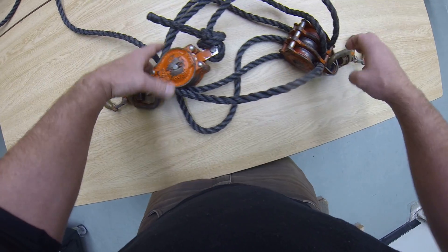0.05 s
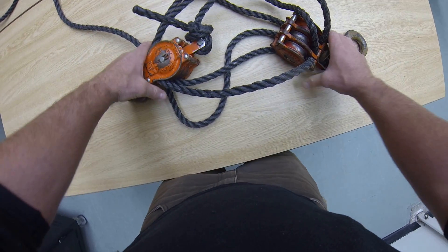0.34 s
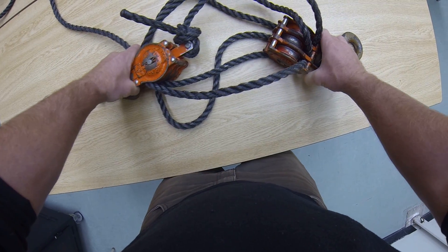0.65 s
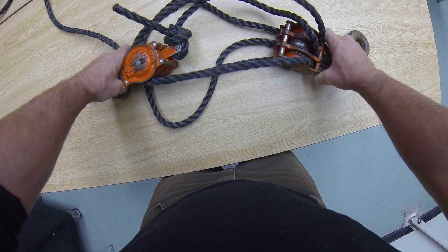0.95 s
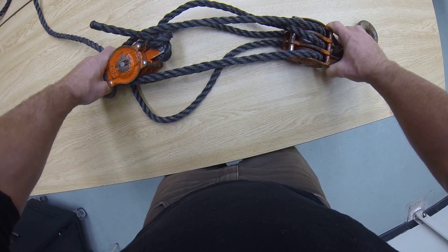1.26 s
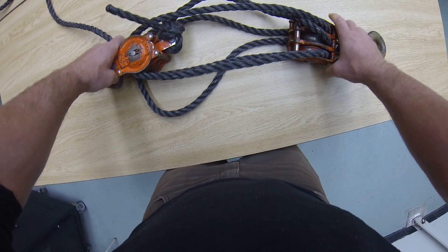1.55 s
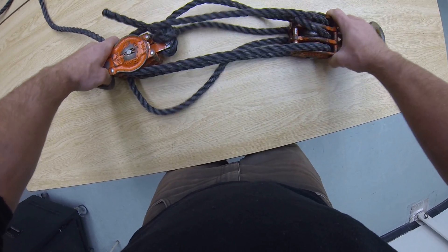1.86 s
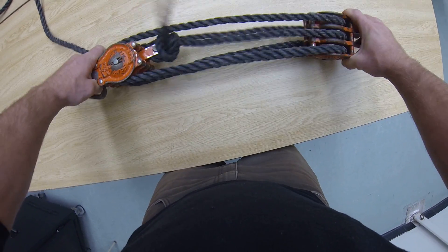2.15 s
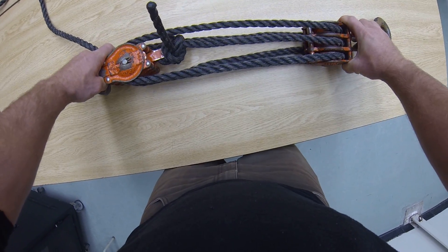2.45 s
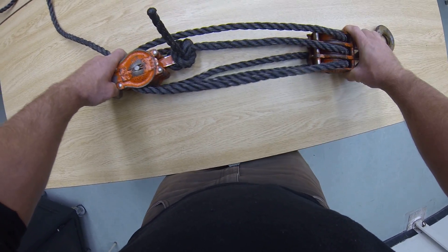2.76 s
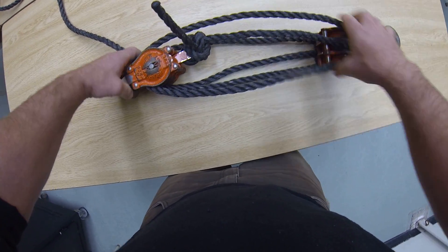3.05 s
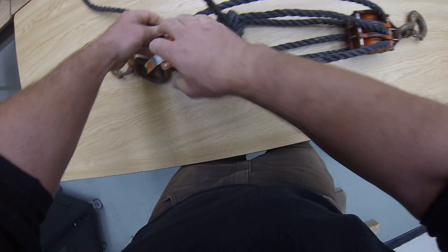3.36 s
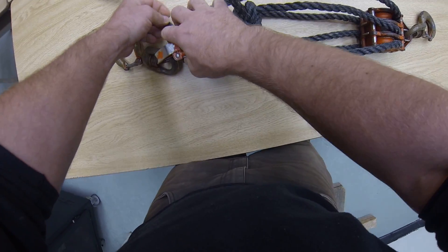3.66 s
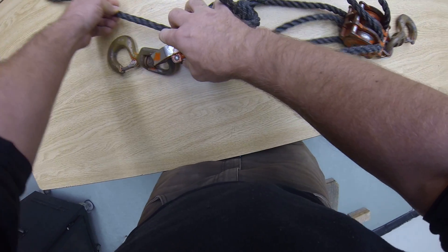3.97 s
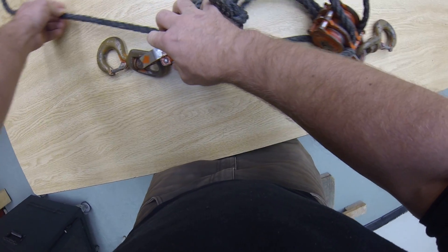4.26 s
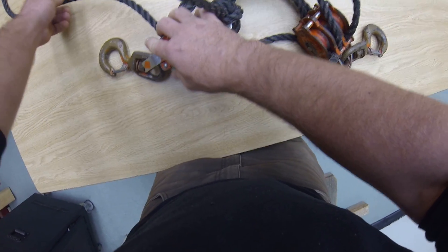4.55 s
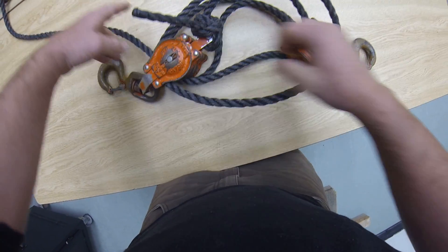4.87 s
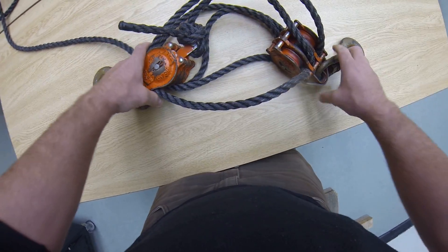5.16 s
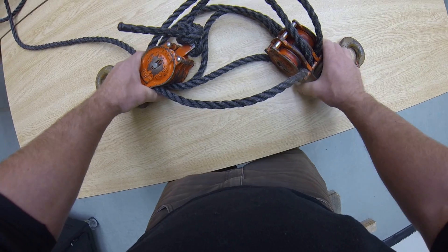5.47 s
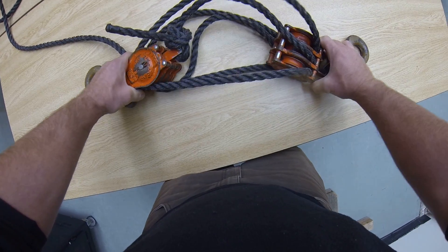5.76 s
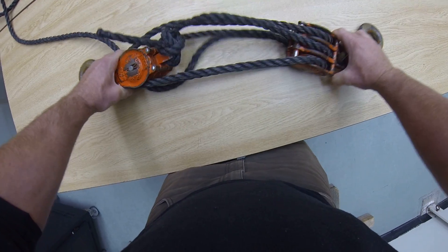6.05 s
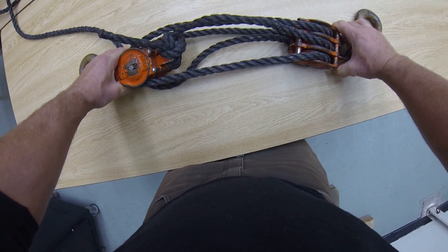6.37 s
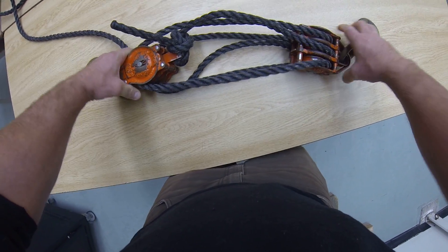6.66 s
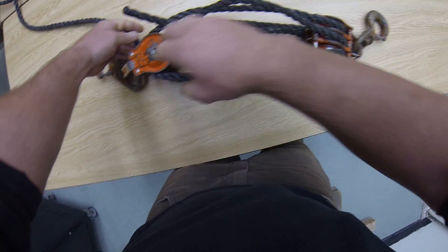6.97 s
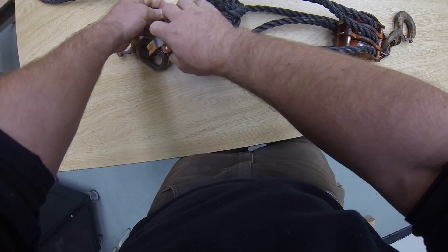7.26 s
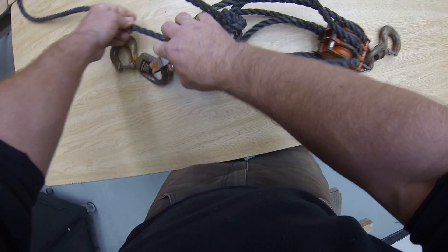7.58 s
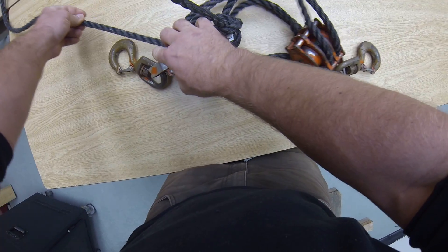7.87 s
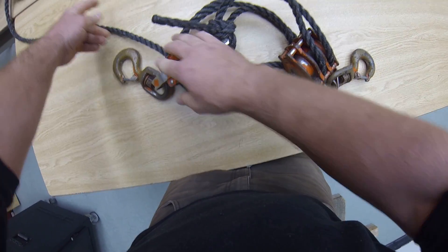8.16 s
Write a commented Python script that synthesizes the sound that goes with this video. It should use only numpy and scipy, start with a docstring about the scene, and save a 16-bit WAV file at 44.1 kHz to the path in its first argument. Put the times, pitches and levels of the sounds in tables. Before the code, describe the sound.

Rope rasps through rumbling pulley blocks in short pulls, while the metal blocks knock, scrape and clank on a wooden table.

```python
"""A bare room, where a block and tackle is drawn apart and hauled together three times on a wooden table.
Stick-slip friction in turning sheaves and sliding blocks drives the modes of the table top into a rumble, while
the laid rope rasps and crackles. Impacts of blocks and hooks, and rope strands bumping over a sheave, excite
knocks, clicks and two hard iron clanks, over a steady ventilation noise. A limiter ducks the two clanks, and
its slow recovery lets the room swell up behind them."""
import sys
import numpy as np
from scipy import signal
from scipy.fft import rfft, irfft
from scipy.io import wavfile
from scipy.ndimage import uniform_filter1d

SR = 44100
rng = np.random.default_rng(int(sys.argv[2]) if len(sys.argv) > 2 else 0)


def master(y):
    """Save y as 16-bit WAV."""
    cut = np.clip(np.atleast_2d(y).T, -1, 1)
    pcm = np.round(cut * 32767)  # scale
    wavfile.write(sys.argv[1], SR, pcm.astype(np.int16))


N = 371322
TIME = np.arange(N) / SR

# Pulls on the tackle. Each row: start and length in seconds, rumble at mid-pull in dB, swell from start
# to end in dB, block drag and rope rasp in dB against the rumble. Levels are relative within each table.
PULLS = [(0.535, 0.024, -31.5, -10, 4.5, -28), (0.66, 0.23, -35, 2, 4.5, -19),
         (0.848, 0.29, -29, 12, 3, -15.5), (1.448, 0.025, -28.5, -10, -2, -23),
         (1.758, 0.27, -34.5, 12.5, 1.5, -14.5), (2.118, 0.19, -39, -5, 6, -10),
         (2.785, 0.47, -34, -2, -0.5, -15.5), (3.426, 0.44, -43.5, 9, -1, -13),
         (3.777, 0.16, -32.5, 18.5, 7.5, -15), (3.962, 0.41, -21, 5, -7.5, -16),
         (4.521, 0.36, -41, 7.5, 6.5, -8), (5.026, 1, -44.5, 7, -1.5, -12),
         (5.592, 0.14, -28.5, 7.5, 7, -16.5), (5.97, 0.4, -27.5, -11.5, 1, -15.5),
         (6.588, 0.061, -38, -4, 4.5, -11), (7.465, 0.1, -28.5, 5.5, -2.5, -15),
         (7.56, 0.33, -20.5, 12, -9, -16.5), (7.953, 0.053, -37, -10, 6, -16),
         (8.11, 0.3, -36, -11, -19, -10)]
# Faint stirring between pulls. The entries: levels of rumble, drag and rasp in dB.
IDLE_DB = [-61, -54, -76.5]
# Blocks scraping over the table. Each row: start and length in seconds, level in dB, first and last
# pitch in Hz.
SLIDES = [(0.864, 0.43, -34, 300, 221), (1.881, 0.22, -30, 350, 304.6), (2.07, 0.58, -48, 212.8, 158.4),
          (5.579, 0.272, -32.5, 280.8, 315), (5.929, 0.5, -32, 360, 260)]
# A sheave pin gripping. Each row: start and length in seconds, level in dB, pitch in Hz.
GRUNTS = [(3.558, 0.028, -19.5, 485), (4.439, 0.024, -14, 500)]
# Motions of the rope. Each row: start in seconds, length in seconds, level in dB.
SLACK_RUNS = [(1.6, 0.37, -42), (2.03, 0.26, -52), (4.85, 0.27, -51), (7.0, 0.36, -54), (7.36, 0.17, -42)]  # running out with no load
STRAINS = [(0.55, 0.33, -64), (0.88, 0.17, -53), (1.02, 0.18, -52), (2.06, 0.25, -48), (5.99, 0.13, -44)]  # fibres snapping taut
GRIPS = [(3.32, 0.39, -55), (7.02, 0.2, -54.5)]  # squeezed in the hand
BRUSHES = [(3.4, 1, -64), (4.7, 0.69, -65), (6.3, 0.87, -63.5), (7.3, 0.71, -62)]  # running lightly through the hand

# Impacts. Each row: start in seconds, level in dB, contact pitch in Hz (higher is harder).
KNOCKS = [(0.553, -27.5, 445), (0.571, -18.5, 386), (0.598, -17.5, 445), (0.627, -23.5, 450),
          (0.682, -26.5, 436), (0.731, -16.5, 540), (0.914, -15, 308), (1.217, -17, 272),
          (1.481, -12.5, 364), (1.509, -13, 375), (1.5617, -3.5, 308), (1.577, -12.5, 290),
          (1.858, -15.5, 264), (2.6076, -2, 310), (2.624, -9, 300), (2.646, 1, 222), (2.7726, -2.5, 428),
          (2.780, -26, 400), (3.0395, -12.5, 480), (3.0455, -16, 765), (3.171, -16.5, 388),
          (3.563, -20.5, 460), (3.752, -20.5, 370), (4.146, -13.5, 317), (4.276, -20, 560),
          (4.318, -23, 520), (4.371, -13.5, 460), (4.456, -9.5, 530), (4.802, -18.5, 250),
          (4.871, -14, 350), (4.878, -16, 128), (5.276, -18.5, 360), (5.296, -22.5, 294.4),
          (5.548, -37, 293), (5.613, -21.5, 400), (5.789, -13.5, 450), (5.995, -30, 477),
          (6.023, -12.5, 450), (6.199, -15, 420), (6.282, -17, 380), (6.808, -28, 435), (7.346, -35.5, 490),
          (7.498, -13.5, 470), (7.537, -20, 466), (7.599, -11.5, 580), (7.716, -10.5, 473),
          (7.758, -14, 620), (7.929, -14, 550), (8.1415, -17, 480), (8.148, -8.5, 194), (8.304, -15, 264),
          (8.311, -17.5, 158.3)]  # blocks and hooks on the table; those within the hauls are rope strands bumping over a sheave
CLANKS = [(1.5615, 3.5, 1020), (2.6533, 3.5, 945)]  # iron on iron: the near block, then the far one
CLICKS = [(0.055, -33, 2300), (0.445, -39.5, 1690), (0.590, -33, 2140), (0.611, -38, 2200),
          (0.736, -45, 2000), (0.922, -30.5, 2880), (0.949, -41, 5200), (1.186, -32.5, 2940),
          (1.482, -33, 1674), (1.836, -45, 8000), (1.926, -36, 7750), (2.093, -31, 2040),
          (2.107, -49, 4500), (2.136, -31.5, 2030), (2.171, -39, 6500), (2.183, -40.5, 3500),
          (2.217, -32, 5430), (2.577, -32, 2080), (2.917, -30.5, 3970), (3.168, -36.5, 3900),
          (3.463, -45.5, 2280), (3.718, -41, 2580), (4.751, -32.5, 2400), (4.871, -17, 1450),
          (4.873, -31.5, 8300), (5.264, -41, 3160), (5.528, -35.5, 1900), (5.786, -32, 3200),
          (6.111, -38, 4950), (7.114, -39, 1900), (7.279, -33, 2180), (7.476, -41, 3000),
          (7.494, -31, 3430), (8.190, -38, 2800), (8.329, -38, 2580)]  # shackles and sheave pins
# Hooks ringing freely. Each row: start in seconds, level in dB, factor on the mode frequencies.
HOOK_HITS = [(0.055, -34, .87), (3.676, -39, .88), (4.751, -37, 1.02), (5.785, -17.5, 1)]

# Modes of a hook. Each row: frequency in Hz, level in dB, time to fall 60 dB in seconds.
HOOK_MODES = [(2013, -6, .03), (2099, 0, .05), (2385, -13, .05), (2875, -10, .06)]
# Modes of the other bodies. Each row: frequency in Hz, bandwidth in Hz, level in dB.
TABLE_MODES = [(96.3, 22, 7), (144.4, 10, 4.5), (207.3, 7, 12), (259.7, 18, 8.5), (293, 26, 2.5),
               (400, 27, 6), (445, 52, 7), (477.5, 29.7, 8.5), (517, 54, -9.5), (620, 140, 5),
               (674, 16, -0.5), (770, 36, 6.5), (980, 18, -17), (893, 30, 3.5), (978, 18, 0.5),
               (1016, 28, 6.5), (1150, 14, -6.5), (1410, 30, 4), (1558, 7.9, -1.5), (1930, 10, 0),
               (1870, 14, 4)]
NEAR_BLOCK_MODES = [(565, 26, 8), (805, 16, 6), (872, 20, 8), (942, 18, 8), (1005, 13, 9), (1050, 14, 8),
                    (1126, 11, 7), (1556, 16, 4), (1787, 45, 6), (1938, 14, 3), (2051, 16, 3)]
FAR_BLOCK_MODES = [(425, 14, 0), (598, 14, 0), (725, 12, 6), (785, 14, 5), (883, 16, 5), (933, 20, 10),
                   (1067, 40, 12), (1114, 20, 5), (1545, 16, 3), (1800, 25, 3), (1940, 30, 4),
                   (2191, 18, 3)]
SHACKLE_MODES = [(2080, 62, -3.5), (2900, 120, 4.5), (3880, 130, 3.5), (5200, 180, 5), (6460, 160, 9.5),
                 (8500, 250, 13.5)]
PIN_MODES = [(1790, 60, -3), (2060, 130, 3)]

# Spectra of the sources. Each row: frequency in Hz, level in dB.
SHEAVE_SPECTRUM = [(120, -45), (260, 3.5), (400, -4), (500, 4.5), (700, -1.5), (1050, -8.5), (1300, -12),
                   (2000, -35.5), (4000, -56.5), (15000, -100)]
DRAG_SPECTRUM = [(40, -33), (90, -10), (165, -4), (215, -3.5), (275, -2), (340, -3), (500, -20),
                 (1200, -72), (8000, -100)]
RASP_SPECTRUM = [(600, -13), (1300, -8.5), (1700, 1.5), (2100, 0.5), (2500, -9), (3100, -6.5), (4300, -23),
                 (5200, -25), (6800, -45.5), (8600, -33.5), (14000, -56.5)]
SNAG_SPECTRUM = [(100, -56.5), (500, -21), (750, -8), (1080, -1.5), (1350, -10), (1800, -5), (2150, -14),
                 (2600, -19.5), (4000, -33), (15000, -69)]  # strands catching on the cheek of a block
KNOCK_SPECTRUM = [(40, 0.5), (120, -3), (400, -0.5), (1100, 1.5), (1400, -2.5), (2000, 10.5), (2500, -1.5),
                  (3300, 0.5), (5000, -19), (7000, -12.5), (11000, -27.5), (15000, -16.5)]
CLANK_SPECTRUM = [(50, -9.5), (130, -5), (300, 12), (480, 6), (700, 6.5), (900, 2), (1150, 2), (1400, 3.5),
                  (1900, 10.5), (2500, 3.5), (3200, 6.5), (4300, -2.5), (5500, -4.5), (7000, -23.5),
                  (11000, -41.5), (15000, -53)]
CLICK_SPECTRUM = [(60, -40.5), (300, -16.5), (1200, -11), (2000, -9.5), (5500, -12.5), (7000, -18.5),
                  (11000, -12), (15000, -24)]
BRUSH_SPECTRUM = [(1500, 3.5), (2800, 4.5), (3700, 11.5), (4300, -4), (5050, 8.5), (6200, -42.5),
                  (7800, -17), (8800, 2.5), (10000, -44), (15000, -32)]
AIR_SPECTRUM = [(20, 1), (45, -10.5), (85, -11.5), (140, -7), (210, -15.5), (500, -20), (1000, -29),
                (1400, -36), (1950, -34.5), (2500, -42), (3200, -42), (4300, -51.5), (5100, -49),
                (6500, -56), (11500, -55.5), (15000, -64.5)]
# Machine hum in the building and a thin electronic whine. Each row: frequency in Hz, level in dB.
HUM_TONES = [(43, -44.5), (145, -51.5), (1933, -91.5), (10644, -79.5), (13188, -94)]

# Reverberation. Each row: frequency in Hz, time to fall 60 dB in seconds.
ROOM_T60 = [(100, 0.64), (400, 0.86), (1000, 1), (2000, 1), (4000, 0.74), (6000, 0.73), (10000, 0.18)]
# Early reflections. Each row: delay in seconds, gain as a factor.
ECHOES = [(.0058, -0.0028), (.009, 0.038), (0.0116, -0.17), (0.016, .3), (.0265, 0.15)]


def hauling(lay_hz=23.28, lay_db=3.2):
    """Stick-slip friction drives sheaves, blocks and rope; strands bumping over a sheave modulate it."""
    rumble, drag, rasp = efforts()
    strands = amp(-lay_db * np.cos(2 * np.pi * lay_hz * TIME + 0.33 * wander(2.1)))
    surges = amp(0.8 * wander(25))  # the rope binds and frees
    jolts = colour(slips(per_s=1200, spread_db=2.5) * strands, SHEAVE_SPECTRUM)
    sheaves = table_top(through(jolts, ringing(NEAR_BLOCK_MODES, ring_db=-17.5)))
    blocks = table_top(colour(slips(per_s=500, spread_db=4), DRAG_SPECTRUM))
    rubbing = colour(slips(per_s=1200, spread_db=4) * strands, RASP_SPECTRUM)
    rubbing = through(rubbing, ringing(PIN_MODES, ring_db=-3.5))
    rope = unit(through(rubbing, room(wet_db=1)))
    snags = colour(slips(per_s=220, spread_db=2) * strands, SNAG_SPECTRUM)
    snags = through(snags, ringing(FAR_BLOCK_MODES, ring_db=-9))
    snags = unit(through(snags, room(wet_db=-6)))
    turning = rumble * (amp(-1.4) * sheaves + amp(-16) * snags)
    running = amp(-6.5) * (rasp + swells(SLACK_RUNS)) * rope
    return surges * (turning + running) + amp(-1.5) * drag * blocks


def efforts(attack_s=0.076, coast_db_per_s=59.5):
    """Incoherent pulls add in power. Rumble and rasp grow with speed; dry sliding drag does not."""
    power = amp(IDLE_DB)[:, None] ** 2 * np.ones(N)
    for start, length, db, swell_db, drag_db, rasp_db in PULLS:
        t = TIME - start
        stroke = np.clip(t / attack_s, 0, 1) * amp(db - coast_db_per_s * np.maximum(t - length, 0))
        speed = amp(swell_db * (np.clip(t / length, 0, 1) - .5))
        power += np.square([stroke * speed, stroke * amp(drag_db), stroke * speed * amp(rasp_db)])
    return np.sqrt(power)


def table_top(force, places=3, shifts_per_s=2.5):
    """Modal response depends on the driving point, so table and room ring differently as blocks travel."""
    out = np.zeros(N)
    for place in range(places):
        coupling = np.cos(np.pi * (shifts_per_s * TIME + place / places))
        body = signal.fftconvolve(ringing(TABLE_MODES, ring_db=-2, uneven_db=4), room(wet_db=1))
        out += through(force * coupling, body)
    return unit(out)


def clanks():
    """Hard impacts excite the free vibration of each iron block; rebounds and loose sheaves clatter."""
    out = np.zeros(N)
    for row, modes in zip(CLANKS, (NEAR_BLOCK_MODES, FAR_BLOCK_MODES)):
        hits = bouncing([row], count=3, gap_s=.0085, rebound_db=-12)
        struck = blows(hits, decay_cycles=0.76, chatter_db=0.5, chatter_t60=0.065)
        out += through(struck, ringing(modes, ring_db=-5))
    return through(colour(out, CLANK_SPECTRUM), room(wet_db=-12, build_s=0.03))


def knocks(places=4):
    """Impacts of blocks and hooks, and strands of the rope bumping over a sheave during hauls, excite the
    table's modes, in different proportions at each place."""
    out = np.zeros(N)
    for place in range(places):
        hits = bouncing(KNOCKS[place::places], count=1, gap_s=.0068, rebound_db=-1.5)
        struck = amp(-0.02) * blows(hits, decay_cycles=0.51, chatter_db=-4.5, chatter_t60=0.029)
        out += through(struck, ringing(TABLE_MODES, ring_db=-6, uneven_db=1.5))
    return through(colour(out, KNOCK_SPECTRUM), room(wet_db=-9.5))


def clicks():
    """Brief metal contacts excite the high, quickly damped modes of shackles and hooks."""
    struck = amp(5.5) * blows(CLICKS, decay_cycles=0.9, chatter_db=7, chatter_t60=0.018)
    ticks = through(struck, ringing(SHACKLE_MODES, ring_db=-4))
    t = TIME[:SR // 4]
    for start, blow_db, pitch in HOOK_HITS:
        ring = sum(amp(db - 60 * t / t60) * np.sin(2 * np.pi * hz * pitch * t)
                   for hz, db, t60 in HOOK_MODES)
        add(ticks, start, amp(blow_db) * ring)
    return through(colour(ticks, CLICK_SPECTRUM), room(wet_db=-18))


def judder():
    """Irregular stick-slip of a sliding block makes a low noise band whose centre follows its speed."""
    out = np.zeros(N)
    in_phase, quadrature = wander(105), wander(105)
    for start, length, db, first_hz, last_hz in SLIDES:
        hz = np.interp(TIME, (start, start + length), (first_hz, last_hz))
        phase = 2 * np.pi * np.cumsum(hz) / SR
        out += swells([(start, length, db)]) * (in_phase * np.cos(phase) + quadrature * np.sin(phase))
    return through(out, room(wet_db=-3.5))


def grunts(sag=0.175):
    """Friction sets a gripping pin into oscillation for about a dozen cycles, sagging in pitch."""
    out = np.zeros(N)
    for start, length, db, hz in GRUNTS:
        t = np.arange(0, length, 1 / SR)
        cycles = np.cumsum(hz * (1 - sag * (t / length - .5))) / SR
        add(out, start, amp(db) * np.sin(np.pi * t / length) * np.sin(2 * np.pi * cycles))
    return through(out, room(wet_db=-17.5))


def fibres():
    """Rope fibres release stress in clustered impulses under load or grip; light brushing is a hiss."""
    snaps = slips(per_s=900, spread_db=2.5) * amp(4 * wander(60))
    crackle = colour(snaps, [(900, -10), (2100, 18.5), (3500, -1), (5400, -4.5), (7000, -17.5),
                             (9000, -8.5), (15000, -28)])
    clumps = slips(per_s=900, spread_db=2) * amp(6 * wander(45))
    crunch = colour(clumps, [(700, -28), (1500, 7), (2000, 6), (3000, -6), (5000, -24), (12000, -36)])
    hiss = colour(rng.standard_normal(N), BRUSH_SPECTRUM)
    return swells(STRAINS) * unit(crackle) + swells(GRIPS) * unit(crunch) + swells(BRUSHES) * unit(hiss)


def background(air_db=-41.5):
    """Hum and whine are spectral lines of wandering phase on the continuous spectrum of ventilation."""
    tones = sum(amp(db) * np.sqrt(2) * np.sin(2 * np.pi * hz * TIME + 1.2 * wander(7.2))
                for hz, db in HUM_TONES)
    return tones + amp(air_db) * unit(colour(rng.standard_normal(N), AIR_SPECTRUM))


def slips(per_s, spread_db):
    """Stick-slip as a Poisson process: jolts at random moments, a few much larger than the rest."""
    size = amp(spread_db * np.minimum(rng.exponential(1, N), 4))
    return size * rng.choice([-1, 1], N) * (rng.random(N) < per_s / SR)


def blows(rows, decay_cycles, chatter_db, chatter_t60):
    """Each contact is a damped oscillator, driven by an impulse and the brief chatter of loose parts."""
    out, t = np.zeros(N), TIME[:SR // 12]
    for start, db, hz in rows:
        swing = np.sin(2 * np.pi * hz * t) * np.exp(-hz * t / decay_cycles)
        chatter = rng.standard_normal(len(t)) * amp(-60 * t / chatter_t60) * (1 - np.exp(-t / .001))
        force = (t == 0) + amp(chatter_db) * chatter / np.linalg.norm(chatter)
        add(out, start, amp(db) * signal.fftconvolve(swing, force))
    return out


def bouncing(rows, count, gap_s, rebound_db):
    """Elastic rebound follows each blow with weaker contacts, a little uneven in time and pitch."""
    out = list(rows)
    for start, db, hz in rows:
        for k, (late, sharp) in enumerate(rng.uniform(-1, 1, (count, 2)), start=1):
            out.append((start + gap_s * (k + 0.16 * late), db + rebound_db, hz * (1 + 0.17 * sharp)))
    return out


def ringing(modes, ring_db, uneven_db=0):
    """A body's impulse response: the blow itself, then modes whose bandwidths set their decay rates."""
    t = TIME[:SR // 3]
    hz, width, db = np.transpose(modes)
    gains = amp(db + uneven_db * rng.standard_normal(len(hz))) * 2 * np.pi * width / SR
    decays = np.exp(-np.pi * np.outer(width, t))
    ring = gains @ (decays * np.cos(2 * np.pi * np.outer(hz, t)))
    return (t == 0) + amp(ring_db) * ring


def room(wet_db, build_s=0.013):
    """The room's impulse response: direct sound, early reflections, a diffuse tail dying band by band."""
    hz, t, spectra = signal.stft(rng.standard_normal(SR), SR, nperseg=256)
    decay = amp(-60 * t / read(ROOM_T60, hz)[:, None])
    tail = signal.istft(spectra * decay, SR)[1][:SR]
    tail *= 1 - np.exp(-TIME[:SR] / build_s)
    response = amp(wet_db) * tail / np.linalg.norm(tail)
    response[0] += 1
    for delay, gain in ECHOES:
        add(response, delay, gain * signal.windows.hann(9) / 4)  # a smeared echo has less treble
    return response


def swells(rows):
    """A raised-cosine envelope gives each stroke a smooth rise and fall."""
    out = np.zeros(N)
    for start, length, db in rows:
        add(out, start, amp(db) * np.hanning(int(length * SR)))
    return out


def wander(cutoff_hz):
    """Low-pass noise gives a random fluctuation of rms 1."""
    rolloff = 1 + (np.fft.rfftfreq(N, 1 / SR) / cutoff_hz) ** 4
    return unit(irfft(rfft(rng.standard_normal(N)) / rolloff, N))


def colour(x, points, size=8192):
    """A minimum-phase filter imposes the given spectrum causally."""
    log_gain = np.log(amp(read(points, abs(np.fft.fftfreq(size, 1 / SR)))))
    transfer = np.exp(np.conj(signal.hilbert(log_gain)))
    return through(x, np.fft.ifft(transfer).real[:size // 2])


def through(x, response):
    """A linear system convolves its input with its impulse response."""
    return signal.fftconvolve(x, response)[:N]


def add(mix, start_s, sound):
    """Superposes a delayed sound on the mix."""
    part = mix[max(round(start_s * SR), 0):][:len(sound)]
    part += sound[:len(part)]


def read(points, hz):
    """Interpolates a table on a logarithmic frequency axis."""
    frequencies, values = np.transpose(points)
    return np.interp(np.log(hz + 1), np.log(frequencies + 1), values)


def amp(db):
    """Converts decibels to an amplitude ratio."""
    return 10 ** (np.asarray(db) / 20)


def unit(x):
    """Normalises to rms 1."""
    return x / np.sqrt(np.mean(x ** 2) + 1e-20)


def scene():
    """By superposition, the pressures of all sources add at one point."""
    return (hauling() + judder() + grunts() + fibres() + knocks() + clanks() + clicks() + background())[None]


def record(dry, recover_db_per_s=19, ceiling_db=0.0, look_ahead_s=.017, cutoff_hz=15200):
    """Peak limiting: the gain falls just ahead of a peak and recovers slowly; a low-pass follows."""
    over_db = np.maximum(20 * np.log10(abs(dry[0]) + 1e-9) - ceiling_db, 0)
    recovery_db = recover_db_per_s * TIME
    held_db = np.maximum.accumulate(over_db + recovery_db) - recovery_db
    duck_db = uniform_filter1d(np.interp(TIME + look_ahead_s, TIME, held_db), size=400)
    low_pass = signal.firwin(511, cutoff_hz, window=("kaiser", 9), fs=SR)
    return signal.oaconvolve(dry * amp(-duck_db), low_pass[None], "same")


dry = scene()
out = record(dry)
master(out)
```